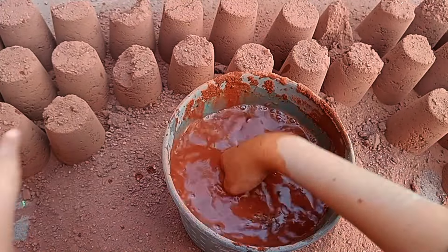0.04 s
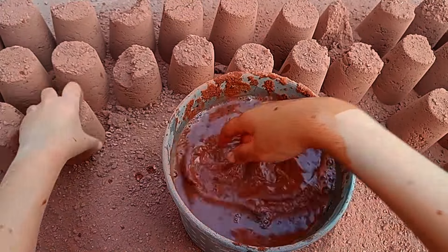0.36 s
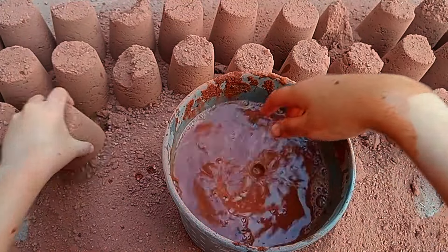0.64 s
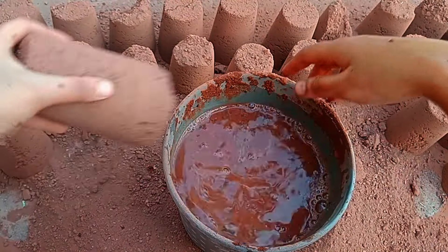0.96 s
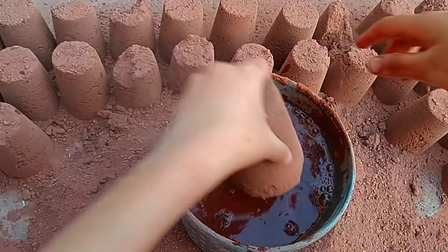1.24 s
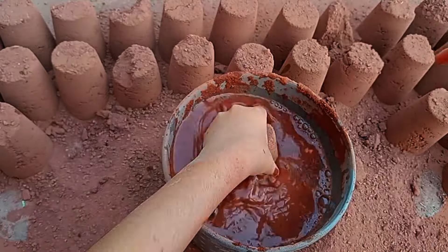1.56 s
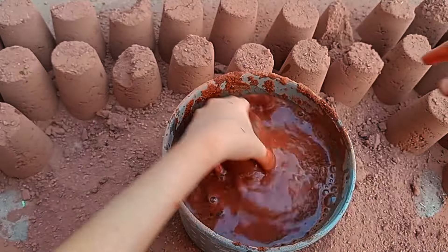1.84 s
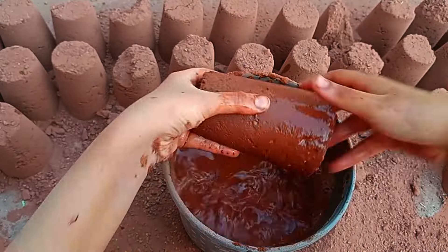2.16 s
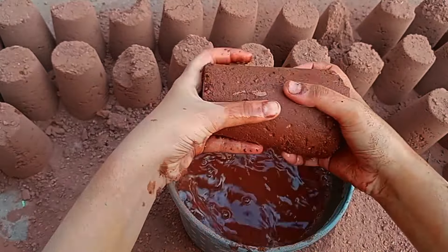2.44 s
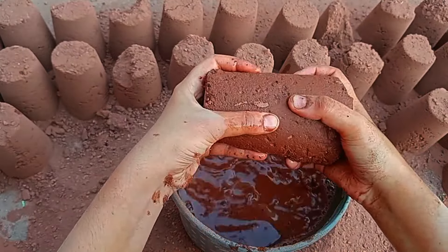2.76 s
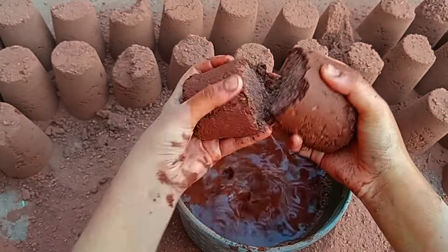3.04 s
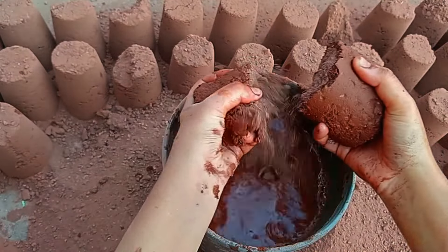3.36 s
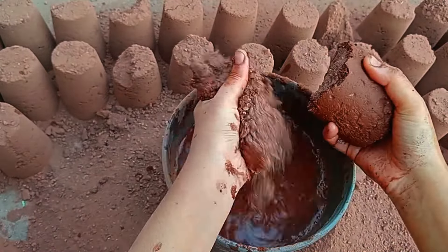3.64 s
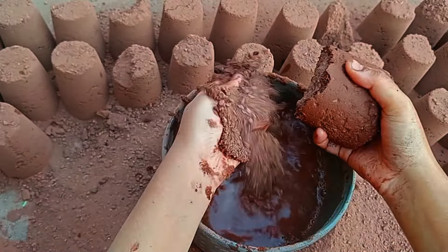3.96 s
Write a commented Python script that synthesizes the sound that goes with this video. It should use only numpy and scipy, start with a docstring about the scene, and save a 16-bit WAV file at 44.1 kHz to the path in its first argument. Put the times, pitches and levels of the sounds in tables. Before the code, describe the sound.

Close sloshing and plopping in a bucket of muddy water outdoors. A packed sand block goes under and comes up with a gurgling splash, crackles wetly and breaks, its grit pouring in among louder plops over a low background rumble.

```python
"""An open yard, the microphone close to a bucket of muddy water, over a low rumble and a high hiss.
A hand stirs the water, dunks a block of packed sand and lifts it out, streaming. The block snaps;
grit pours and wet lumps plop in, each clicking on the surface and trapping a bubble that rings.
The bucket resonates, and the microphone's limiter ducks the background after each loud plop."""
import sys
import numpy as np
from scipy import signal
from scipy.fft import rfft, irfft, next_fast_len
from scipy.io import wavfile
from scipy.ndimage import uniform_filter1d, map_coordinates

SR = 44100
rng = np.random.default_rng(int(sys.argv[2]) if len(sys.argv) > 2 else 0)


def put_to_file(sound):
    """Save the sound as 16-bit audio at rate SR, in the file named by the first command-line argument."""
    columns = np.atleast_2d(sound).T  # one column per channel
    safe = np.clip(columns, -1, 1)
    whole_steps = np.round(safe * 32767)
    wavfile.write(sys.argv[1], SR, whole_steps.astype(np.int16))


N = 176400  # 4 s


def amp(db):
    """Decibels to gain."""
    return 10 ** (np.asarray(db) / 20)


def unit(x):
    """Scale to rms 1."""
    return x / np.sqrt(np.mean(x ** 2) + 1e-20)


def level(rows):
    """Gain per sample from (t/s, level/dB) points."""
    return amp(np.interp(np.arange(N) / SR, *np.transpose(rows)))


def wobble(per_s):
    """A smooth random curve with per_s knots a second."""
    return map_coordinates(rng.standard_normal(400), [np.arange(N) * per_s / SR], mode="wrap")


def add(track, start, sound):
    """Mix a sound in at start seconds."""
    part = track[max(round(start * SR), 0):][:len(sound)]
    part += sound[:len(part)]


def filtered(x, response):
    """x through a complex response of frequency."""
    size = next_fast_len(N + SR // 2)
    return irfft(rfft(x, size) * response(np.fft.rfftfreq(size, 1 / SR)), size)[:N]


def coloured(x, points, size=2048):
    """x through a causal filter of unit power, shaped by (f/Hz, level/dB) points."""
    hz, db = np.transpose(points)
    gain = amp(np.interp(np.log(np.fft.rfftfreq(size, 1 / SR) + 1), np.log(hz), db))
    cepstrum = irfft(np.log(gain))
    cepstrum[1:size // 2] *= 2  # fold to minimum phase
    cepstrum[size // 2 + 1:] = 0
    kernel = irfft(np.exp(rfft(cepstrum)))
    return signal.fftconvolve(x, kernel / np.linalg.norm(kernel))[:len(x)]


def resonant(x, modes):
    """x through a set of (f/Hz, width/Hz, level/dB) resonances."""
    return filtered(x, lambda f: sum(amp(db) * 1j * f * width / (hz * hz - f * f + 1j * f * width)
                                     for hz, width, db in modes))


def gliding_noise(rows, width_hz):
    """Noise in one gliding resonance, from (t/s, level/dB, f/Hz) points."""
    times, db, hz = np.transpose(rows)
    phase = 2 * np.pi * np.cumsum(np.interp(np.arange(N) / SR, times, hz)) / SR
    a, b = (unit(filtered(noise, lambda f: 1 / (1 + (f / width_hz) ** 2)))
            for noise in rng.standard_normal((2, N)))
    return level(np.transpose([times, db])) * (a * np.cos(phase) + b * np.sin(phase))


def grains(per_s, hz, spread, cycles, scatter_db, pool, samples):
    """A stream of tiny ringing grains of random pitch and strength, rms 1."""
    when, chance = rng.random((2, pool))
    sounding = chance < per_s * N / SR / pool
    pitch = np.clip(hz * np.exp(spread * rng.standard_normal((pool, 1))), 300, 15000)
    strength = sounding * amp(scatter_db * np.minimum(rng.exponential(size=pool), 3.5))
    turns = pitch * np.arange(samples) / SR
    waves = strength[:, None] * np.sin(2 * np.pi * turns) * amp(-60 * turns / cycles)
    positions = (when * N).astype(int)[:, None] + np.arange(samples)
    return unit(np.bincount(positions.ravel(), waves.ravel(), N)[:N])


def swell(t, length):
    """An envelope that rises to 1 at half of length, then dies away."""
    u = 2 * t / length
    return u * np.exp((1 - u ** 2) / 2)


def echo(x, t60):
    """A diffuse tail that starts just after the sound."""
    t = np.arange(SR // 2) / SR
    tail = rng.standard_normal(len(t)) * amp(-60 * t / t60) * (t > .0015)
    return signal.fftconvolve(x, tail / np.linalg.norm(tail))[:N]


# Low background of the yard: f/Hz, level/dB
RUMBLE_SPECTRUM = [(15, -64), (25, -33.5), (88, -3), (113, 2.5), (262, -16), (313, -14), (374, -17),
                   (477, -26.5), (534, -36.5), (588, -25), (795, -25.5), (860, -43.5), (988, -67),
                   (1070, -73), (1200, -106), (1560, -85), (2640, -120)]
# Its rise and fall: t/s, level/dB
RUMBLE_LEVEL = [(0, -25.5), (.25, -20), (.9, -20.5), (1.2, -18.5), (1.95, -20.5), (2.3, -24), (2.7, -22),
                (3.0, -23.5), (3.25, -19), (3.6, -24.5), (4, -20)]

def rumble():
    """Deep noise that drifts in level behind the bucket."""
    hz, db = np.transpose(RUMBLE_SPECTRUM)
    shape = lambda f: amp(np.interp(np.log(f + 1), np.log(hz), db, right=-120))
    return level(RUMBLE_LEVEL) * unit(filtered(rng.standard_normal(N), shape))


# Hum in the background: t/s, lower note level/dB, upper note level/dB
HUM_LEVELS = [(0, -35, -40), (.3, -19.5, -21), (1.0, -25, -52), (1.7, -19.5, -36), (2.0, -25.5, -27),
              (2.4, -44, -27), (2.9, -26, -24), (3.25, -43, -22), (3.6, -30, -20.5), (4, -42, -27)]

def hum(lower_hz=103.6, upper_hz=148.7):
    """Two low notes, each wavering in pitch and level."""
    times, lower_db, upper_db = np.transpose(HUM_LEVELS)
    out = np.zeros(N)
    for hz, db in (lower_hz, lower_db), (upper_hz, upper_db):
        gain = level(np.transpose([times, db])) * amp(0.59 * wobble(9.8))
        pitch = hz + 3 * wobble(14)
        out += gain * np.sin(2 * np.pi * np.cumsum(pitch) / SR)
    return out


# Open-air hiss and its airy top: f/Hz, level/dB
HISS_SPECTRUM = [(500, -13), (1000, -34), (2000, -26), (3500, -10.5), (5000, -5.5), (6300, -2), (7500, 3.5),
                 (8800, 1), (10000, -6.5), (12500, -9.5), (15500, -29)]
AIR_SPECTRUM = [(1000, -32), (4000, -45), (7000, 5), (9000, 2), (12500, 2), (15500, -12)]
# Each swells and fades on its own: t/s, level/dB
HISS_LEVEL = [(0, -42.5), (.5, -35), (.9, -34), (1.15, -32.5), (1.7, -34), (2.5, -35.5), (3.0, -38.5),
              (4, -34)]
AIR_LEVEL = [(0, -48), (.5, -42), (.75, -38.5), (1.15, -38), (1.4, -33), (1.65, -63), (2.3, -39),
             (2.8, -46), (3.15, -41), (3.5, -32), (4, -46)]
# Drifting patches in the hiss: f/Hz, depth/dB
HISS_DRIFT = [(2800, 5.5), (4200, 1.8)]

def hiss():
    """A high, patchy, finely grained outdoor hiss with a smooth top."""
    f, _, spectra = signal.stft(rng.standard_normal(N), SR, nperseg=512)
    patches = uniform_filter1d(rng.standard_normal(spectra.shape), size=6, axis=0)
    patches = unit(uniform_filter1d(patches, size=16, axis=1))
    depth_db = np.interp(f, *np.transpose(HISS_DRIFT))[:, None]
    patchy = signal.istft(spectra * amp(depth_db * patches), nperseg=512)[1][:N]
    grainy = unit(patchy * amp(3.1 * wobble(700)))
    air = level(AIR_LEVEL) * coloured(rng.standard_normal(N), AIR_SPECTRUM)
    return level(HISS_LEVEL) * coloured(grainy, HISS_SPECTRUM) + air


# Water churned by the hand, close to the microphone: t/s, level/dB
SLOSH_LEVEL = [(0, -40.5), (.12, -35), (.3, -37.5), (.52, -44.5), (.88, -47.5), (1.22, -53), (1.34, -32),
               (1.45, -37), (1.65, -40.5), (1.82, -43.5), (1.98, -37.5), (2.12, -20.5), (2.25, -39),
               (2.5, -33), (2.8, -34), (3.2, -46), (3.35, -32.5), (4, -33)]
# Its colour: f/Hz, level/dB
SLOSH_SPECTRUM = [(300, -4.5), (700, -3.5), (1150, -16), (1700, -9), (2300, -4.5), (3200, -1.5),
                  (6000, -13), (15000, -51)]
# Water welling up round the hand and block: t/s, level/dB, f/Hz
WELLING = [(0, -48, 1000), (.12, -39, 1333), (.2, -37.5, 1114), (.4, -70, 1090), (1.75, -53, 1300),
           (1.88, -43, 1213), (1.95, -29.5, 1093), (2.04, -32, 979), (2.14, -48, 880), (2.3, -65, 895)]

def slosh():
    """Stirred water: a wash of small soft bubbles and a hollow swell."""
    bubbles = grains(per_s=900, hz=1308, spread=0.47, cycles=41, scatter_db=4, pool=5000, samples=800)
    wash = unit(coloured(bubbles + 0.76 * rng.standard_normal(N), SLOSH_SPECTRUM))
    return level(SLOSH_LEVEL) * wash + gliding_noise(WELLING, width_hz=260)


# Wet sand at close range: t/s, level/dB
CRACKLE_LEVEL = [(0, -42.5), (.45, -38), (.6, -38.5), (1.22, -80), (1.3, -37), (1.48, -32.5), (1.62, -49),
                 (1.98, -40), (2.15, -30), (2.28, -25.5), (2.36, -30.5), (2.55, -28.5), (2.68, -26),
                 (2.8, -36.5), (3.05, -48.5), (3.24, -32), (3.5, -26), (4, -22.5)]
# Its colour: f/Hz, level/dB
CRACKLE_SPECTRUM = [(500, -4), (1500, -30), (3000, -2.5), (5000, -4), (8000, 4), (11000, 0), (15500, -3)]

def crackle():
    """Soaked sand fizzes in uneven flurries of tiny ticks."""
    fizz = grains(per_s=2400, hz=5820, spread=0.43, cycles=12, scatter_db=4, pool=12000, samples=150)
    flurries = amp(6.2 * np.tanh(wobble(110)))
    return level(CRACKLE_LEVEL) * unit(coloured(fizz, CRACKLE_SPECTRUM) * flurries)


# Drops and lumps landing near the microphone: t/s, bubble level/dB, f/Hz, t60/s, click level/dB
PLOPS = [(0.099, -21, 1060, 0.03, -34), (0.119, -18, 1390, 0.013, -19), (.197, -34, 1840, 0.019, -19),
         (.4003, 4.5, 3180, 0.007, 1), (1.2744, -6.5, 3830, 0.012, -22), (1.319, -21, 2020, 0.043, -14),
         (1.3368, -13, 2080, 0.013, -1.5), (1.338, -16.5, 925, 0.049, -27), (1.367, -7, 1117, 0.032, -18),
         (1.381, -13, 920, 0.018, -10), (1.544, -16, 1840, 0.0097, -28), (1.864, -13.5, 2850, 0.0082, -20),
         (2.037, -12.5, 3000, 0.017, -11), (2.0975, 0.5, 2800, 0.0064, -15), (2.1054, 6.5, 880, 0.017, -9),
         (2.114, -2, 4450, 0.023, -24), (2.1215, -4, 773, 0.074, -4), (2.1293, 7, 2340, 0.011, -16),
         (2.160, -1.5, 1490, 0.014, -19), (2.180, 3, 3700, 0.0078, 2.5), (2.194, 10.5, 1187, 0.015, 5),
         (2.2213, 2.5, 3020, .012, -7), (2.3252, -7, 2910, 0.022, -9), (2.3536, -12.5, 1455, 0.025, -8),
         (2.411, -10, 840, 0.017, -25), (2.417, -13.5, 3000, 0.013, -25), (2.4583, -1, 793, 0.023, -11),
         (2.463, -13, 1380, 0.02, -32), (2.5235, -17.5, 816, 0.024, -24), (2.6635, -5.5, 1200, 0.011, -32),
         (2.751, -10, 2790, 0.039, -14), (2.7577, 1, 3380, 0.014, -1.5), (2.7781, 6.5, 710, 0.012, 5),
         (2.880, -10, 690, 0.013, -10), (3.293, -22.5, 1410, 0.035, -15), (3.3063, -12, 1920, 0.016, -3),
         (3.3228, 1, 744, 0.0097, -20), (3.3443, 3, 1310, 0.023, 12.5), (3.439, 4, 3900, 0.0053, -6),
         (3.4643, -10, 1520, 0.017, -7), (3.490, -9, 1330, 0.025, 3.5), (3.5223, -7, 2200, 0.024, 7),
         (3.527, -4.5, 1550, .013, -4), (3.545, -4, 700, 0.024, -4.5), (3.5862, 5, 698, 0.034, 10),
         (3.6047, -11, 1450, .02, -12), (3.6268, 11, 1450, 0.0076, -0.5), (3.641, 5, 1350, 0.0084, -13),
         (3.652, 9.5, 2140, 0.0092, 2), (3.6685, 10, 1170, 0.013, 5.5), (3.7012, 1, 1450, 0.028, 15.5),
         (3.7197, 11, 602, 0.023, 3), (3.7632, -4.5, 2550, 0.025, -0.5), (3.7823, 1, 1980, 0.013, -3),
         (3.8307, 10, 636, 0.018, 15.5), (3.8853, -13, 1440, 0.036, 6.5), (3.912, -4, 2300, 0.014, 9.5),
         (3.961, 11.5, 656, 0.037, 12)]
# Colour of the click on the surface: f/Hz, level/dB
CLICK_SPECTRUM = [(200, -40), (430, -1), (650, 7.5), (1500, 5.5), (4000, 7.5), (8000, 6.5), (12000, -1.5),
                  (16000, 3)]
CHIRP_HZ_PER_S, ONSET_S, CLICK_T60_S = 11900, 0.00045, 0.007
FROTH_DB, FROTH_LOG_SPREAD, FROTH_DELAY_S, FROTH_CYCLES = -13, 0.29, 0.002, 9.8

def plops():
    """Each drop clicks on the surface, then its trapped bubble rings and rises in pitch."""
    bubbles, clicks, t = np.zeros(N), np.zeros(N), np.arange(SR // 10) / SR
    onset = 1 - np.exp(-t / ONSET_S)
    for start, db, hz, t60, click_db in PLOPS:
        turns = hz * t + CHIRP_HZ_PER_S * t ** 2 / 2
        add(bubbles, start, amp(db - 60 * t / t60) * onset * np.sin(2 * np.pi * turns))
        # Muddy water breaks each bubble into a froth of smaller ones.
        for shift, delay in zip(rng.exponential(size=6), rng.exponential(size=6)):
            cycles = hz * np.exp(FROTH_LOG_SPREAD * min(shift, 2)) * t
            froth = amp(db + FROTH_DB - 60 * cycles / FROTH_CYCLES) * np.sin(2 * np.pi * cycles)
            add(bubbles, start + FROTH_DELAY_S * delay, froth)
        spray = 0.46 * rng.standard_normal(len(t)) * amp(-60 * t / CLICK_T60_S)
        spray[0] = 2.17  # the impact itself
        add(clicks, start, amp(click_db) * spray)
    return bubbles + coloured(clicks, CLICK_SPECTRUM)


# Air in the bucket as the hand draws out: t/s, level/dB
HOLLOW_LEVEL = [(.18, -65), (.27, -45), (.39, -37), (.43, -83)]
# Its resonances: f/Hz, width/Hz, level/dB
HOLLOW_MODES = [(690, 30, -5), (1078, 15, 2)]

def hollow():
    """Churning water sets the bucket's air ringing faintly."""
    return level(HOLLOW_LEVEL) * unit(resonant(rng.standard_normal(N), HOLLOW_MODES))


# Close wet slaps and sand cracks: t/s, level/dB, centre f/Hz, length/s
SPLATS = [(.414, -26, 4040, 0.0041), (0.689, -27, 3250, 0.0033), (0.818, -23, 6120, 0.0028),
          (1.063, -27, 7590, 0.0028), (1.253, -27, 2900, 0.024), (1.301, -16, 8900, 0.0031),
          (1.376, -18, 5300, 0.021), (1.454, -16.5, 6040, 0.0013), (1.468, -23, 1950, 0.006),
          (1.487, -18, 7060, 0.0041), (1.566, -22, 7140, 0.0052), (1.769, -24, 5900, 0.002),
          (2.062, -27, 7540, 0.0042), (2.0729, -3.5, 4580, 0.003), (2.158, -9, 2900, 0.0029),
          (2.167, -11.5, 5260, 0.0094), (2.183, -9, 3650, 0.023), (2.231, -16, 4470, 0.013),
          (2.288, -21, 8450, .002), (2.3198, -1.5, 6040, 0.0019), (2.3255, -11, 8400, 0.002),
          (2.584, -24, 7390, .002), (2.678, -21, 8500, .005), (2.6842, -10, 8100, 0.0024),
          (2.728, -19.5, 5140, 0.0052), (2.7615, 6.5, 4170, 0.0027), (2.777, -1, 6450, 0.0049),
          (3.1388, -11, 7170, 0.005), (3.275, -22.5, 3130, 0.013), (3.379, -18.5, 4500, 0.023),
          (3.558, -20, 3200, 0.0061), (3.702, 5, 5700, 0.0025), (3.9514, -4.5, 6100, 0.0025)]

def splats(q=1.57, scatter_db=8.5, top_hz=12000):
    """Short clusters of tiny wet snaps, with no clear pitch."""
    out, t = np.zeros(N), np.arange(SR // 10) / SR
    for start, db, hz, length in SPLATS:
        envelope = swell(t, length)
        snaps = rng.standard_normal(len(t)) * amp(scatter_db * rng.standard_normal(len(t)))
        burst = signal.lfilter(*signal.iirpeak(hz, q, fs=SR), envelope * snaps)
        burst *= np.linalg.norm(envelope) / np.linalg.norm(burst)
        add(out, start - .0004, amp(db) * burst)
    return filtered(out, lambda f: 1 / np.sqrt(1 + (f / top_hz) ** 8))


# The dry block leaving the ground, outside the bucket: t/s, level/dB, f/Hz
SCRAPE = [(.52, -47, 4600), (.65, -42, 5940), (.69, -26, 6030), (.75, -38, 6030), (.78, -36, 5160),
          (.83, -33, 5380), (.87, -46, 5270), (.95, -65, 5140)]

def scrape():
    """Dry sand rubs unevenly under the block as it is picked up."""
    return gliding_noise(SCRAPE, width_hz=850) * amp(2.9 * wobble(93))


# A dull bump from under the water: f/Hz, level/dB, t60/s
KNOCK_MODES = [(180, -16, 0.038), (370, -11.5, 0.017), (623, -7, 0.017)]

def knock(start_s=1.5045):
    """The sinking block bumps the bucket, which rings low and briefly."""
    out, t = np.zeros(N), np.arange(SR // 10) / SR
    for hz, db, t60 in KNOCK_MODES:
        add(out, start_s, amp(db - 60 * t / t60) * np.sin(2 * np.pi * hz * t))
    return out


# Water gulping into the hole as the block is pulled out: t/s, level/dB, starting f/Hz, length/s
GLUGS = [(2.087, -10, 1084, 0.0095), (2.107, -5, 990, 0.008), (2.141, -7, 650, 0.014),
         (2.181, -7, 690, 0.02), (2.194, 4.5, 574, 0.017)]

def glugs(rise_hz_per_s2=890000):
    """Large bubbles swell, their pitch climbing ever faster as the hole closes."""
    out, t = np.zeros(N), np.arange(SR // 12) / SR
    for start, db, hz, length in GLUGS:
        turns = hz * t + rise_hz_per_s2 * t ** 3 / 3
        add(out, start, amp(db) * swell(t, length) * np.sin(2 * np.pi * turns))
    return out


# Grit falling on the water, close to the microphone: t/s, level/dB
POUR_LEVEL = [(3.2, -40.5), (3.28, -39), (3.33, -26), (3.37, -25), (3.45, -27), (3.55, -27.5), (3.68, -24),
              (3.75, -26), (3.81, -19), (3.86, -31.5), (3.91, -11.5), (3.96, -24), (4, -42)]
# Its colour: f/Hz, level/dB
POUR_SPECTRUM = [(300, -31.5), (700, 8.5), (1400, -1), (2500, 4.5), (4500, 1), (8000, -3), (12000, 8),
                 (15500, -17)]

def pour():
    """Once the block is broken, loose grit patters into the bucket in clumps."""
    grit = grains(per_s=2000, hz=3300, spread=0.767, cycles=14, scatter_db=3, pool=10000, samples=300)
    clumps = amp(6.7 * np.tanh(wobble(90)))
    broken = np.arange(N) / SR > POUR_LEVEL[0][0]
    return broken * level(POUR_LEVEL) * unit(coloured(grit, POUR_SPECTRUM) * clumps)


# Resonances of the bucket, heard from close by: f/Hz, width/Hz, level/dB
BUCKET_MODES = [(335, 12, 2.5), (646, 30, -3), (1077, 24, -6), (1357, 43, -1), (1454, 63, -0.5),
                (2052, 143, -1.5), (2490, 60, -5.5)]
WALL_DB, WALL_T60_S, YARD_DB, YARD_T60_S = -10.5, 0.013, -18.5, 0.16
LOW_CUT_HZ = 254  # the water and sand sounds are thinned below this

def scene():
    """At the microphone, in mono: water and sand ring the bucket and echo off its wall and the yard."""
    wet = plops() + glugs() + splats() + slosh() + crackle() + pour()
    wet = filtered(wet, lambda f: (1j * f / (LOW_CUT_HZ + 1j * f)) ** 2)
    bucket = resonant(wet, BUCKET_MODES) + amp(WALL_DB) * echo(wet, WALL_T60_S)
    yard = amp(YARD_DB) * echo(wet, YARD_T60_S)
    return (wet + bucket + yard + hollow() + knock() + scrape() + rumble() + hum() + hiss())[None]


LIMIT_RMS, RELEASE_DB_PER_S, CLIP_PEAK, TOP_HZ = 0.54, 90.5, 0.87, 15800

def record(dry):
    """The microphone's fast limiter recovers steadily; sharp clicks slip past and clip; then a low-pass."""
    loudness = np.sqrt(np.abs(uniform_filter1d(dry[0] ** 2, size=45)))  # rms over a millisecond
    over_db = 20 * np.log10(np.maximum(loudness / LIMIT_RMS, 1))
    release_db = RELEASE_DB_PER_S * np.arange(N) / SR
    cut_db = np.maximum.accumulate(over_db + release_db) - release_db
    limited = dry[0] * uniform_filter1d(amp(-cut_db), size=21)
    clipped = limited / (1 + (limited / CLIP_PEAK) ** 10) ** (1 / 10)
    return filtered(clipped, lambda f: f < TOP_HZ)[None]


dry = scene()
out = record(dry)
put_to_file(out)
```